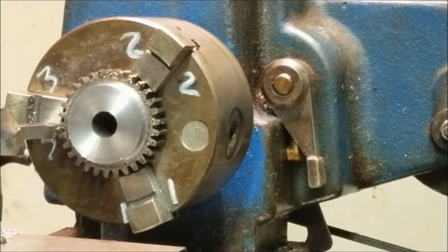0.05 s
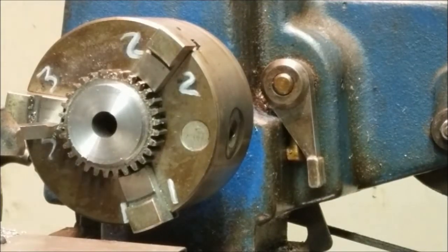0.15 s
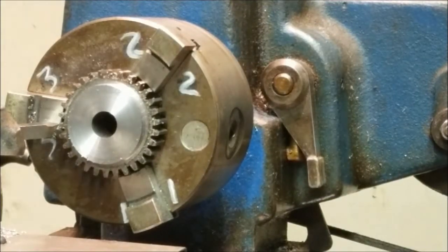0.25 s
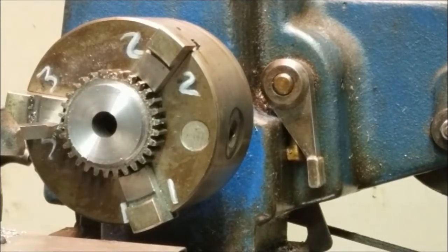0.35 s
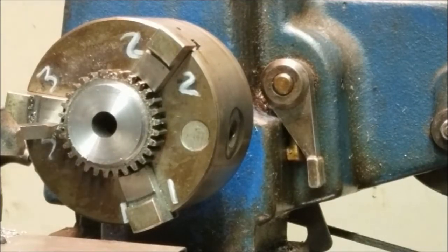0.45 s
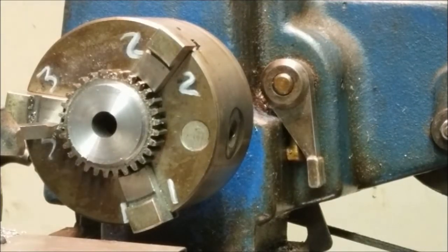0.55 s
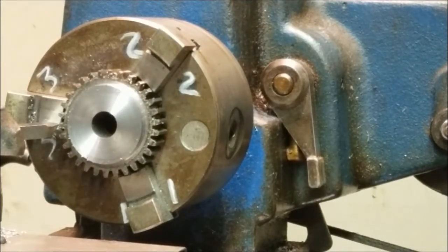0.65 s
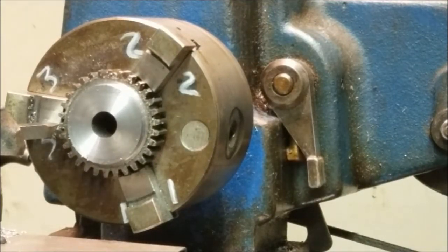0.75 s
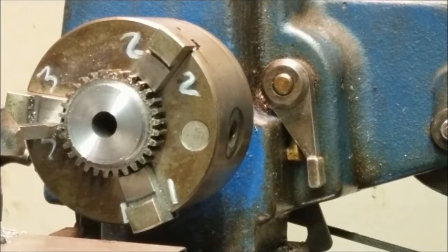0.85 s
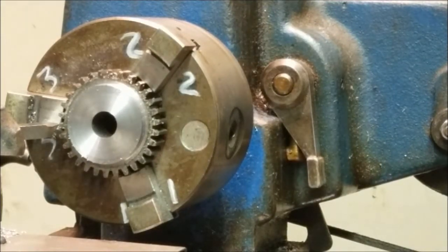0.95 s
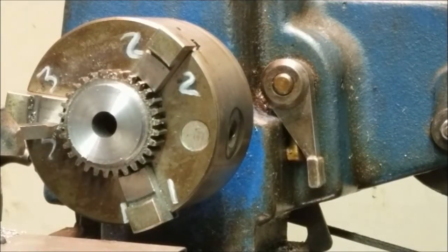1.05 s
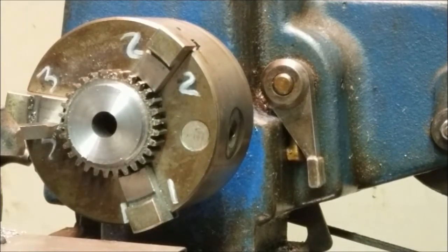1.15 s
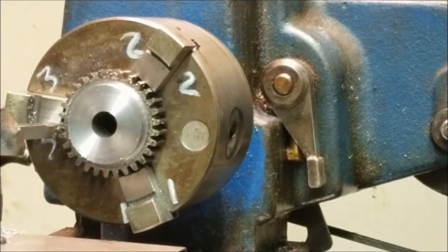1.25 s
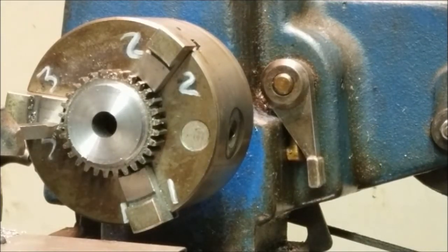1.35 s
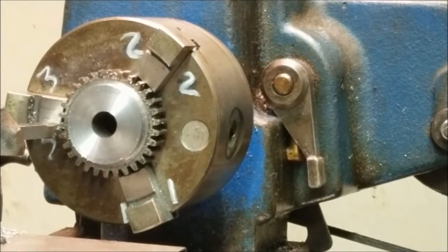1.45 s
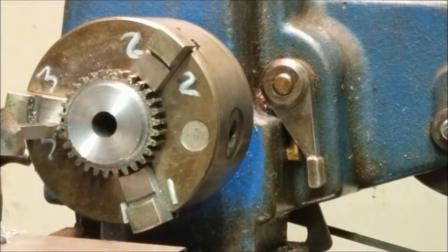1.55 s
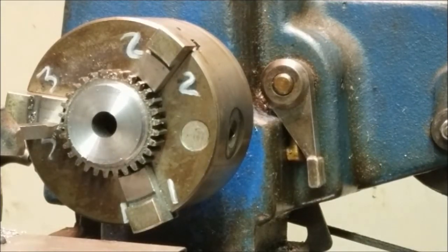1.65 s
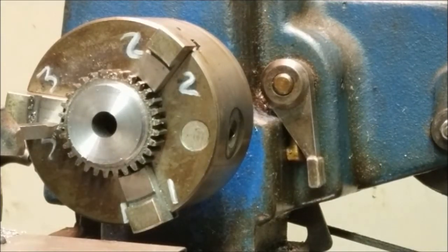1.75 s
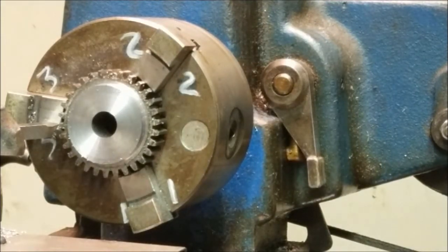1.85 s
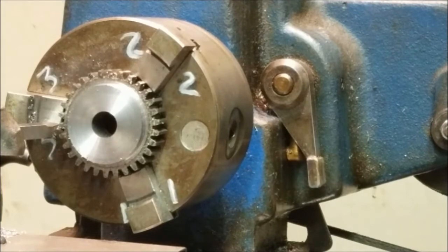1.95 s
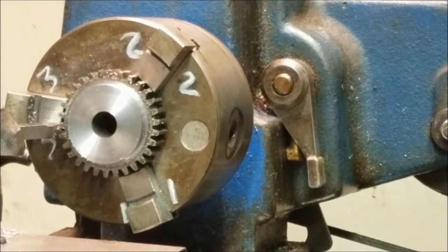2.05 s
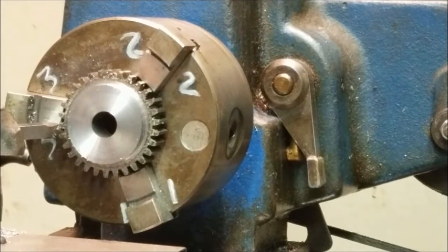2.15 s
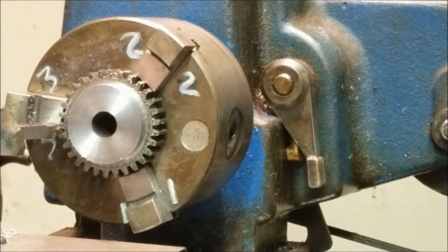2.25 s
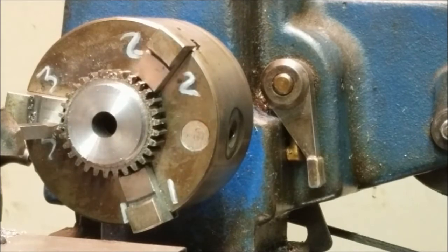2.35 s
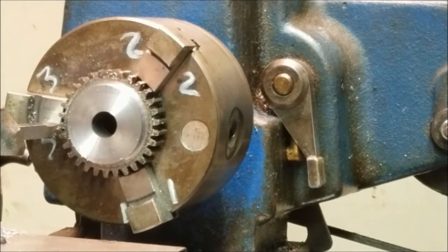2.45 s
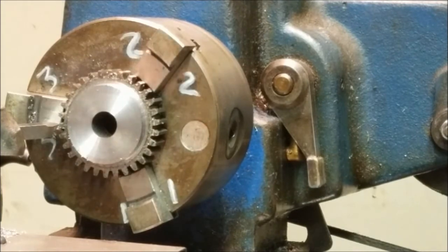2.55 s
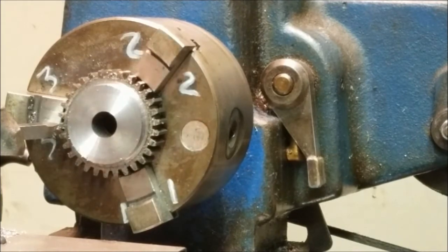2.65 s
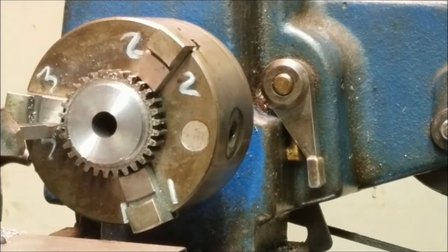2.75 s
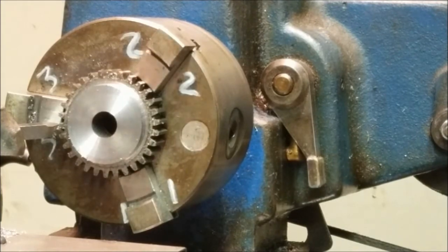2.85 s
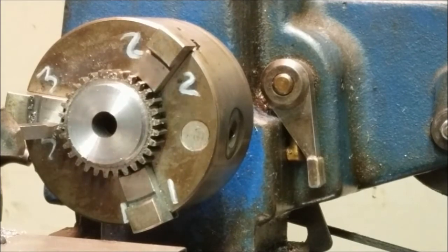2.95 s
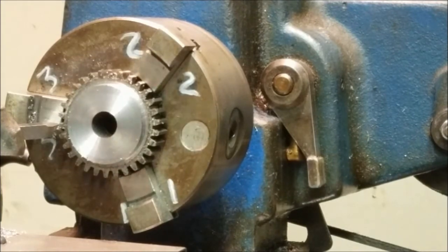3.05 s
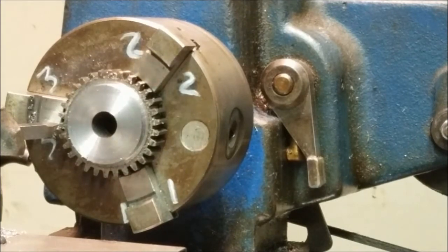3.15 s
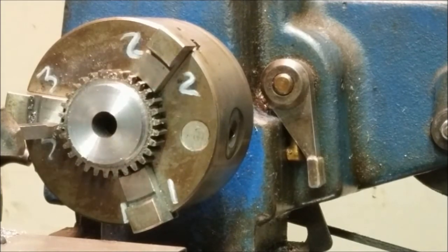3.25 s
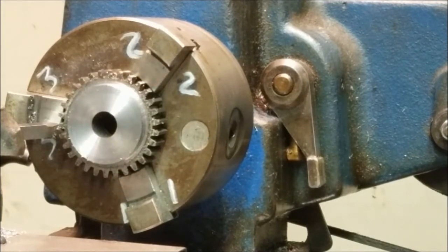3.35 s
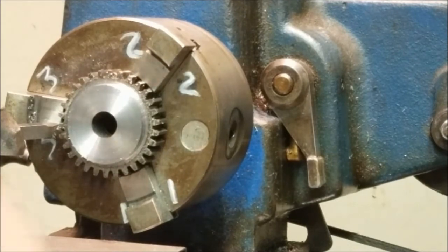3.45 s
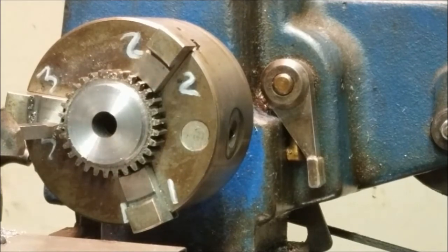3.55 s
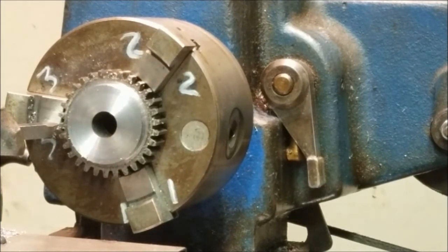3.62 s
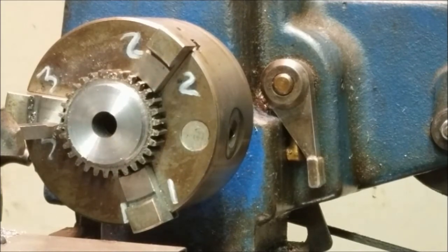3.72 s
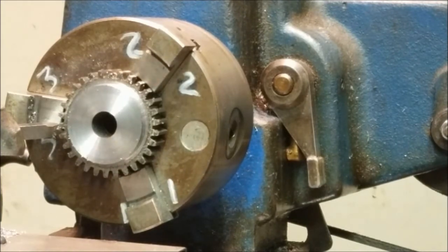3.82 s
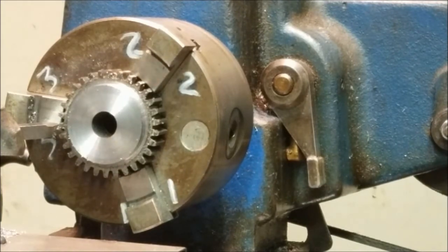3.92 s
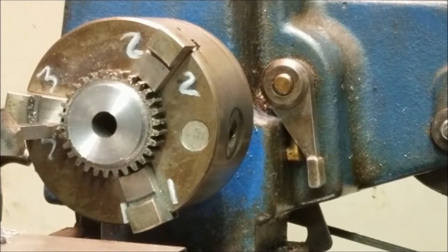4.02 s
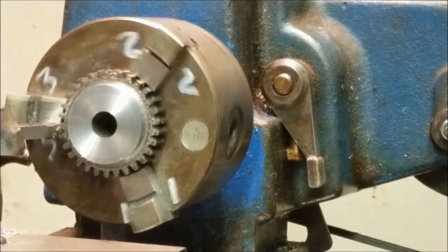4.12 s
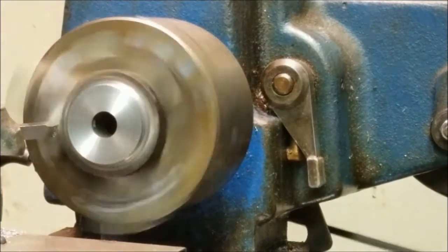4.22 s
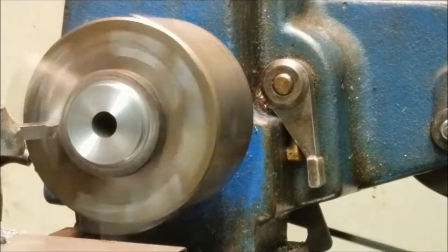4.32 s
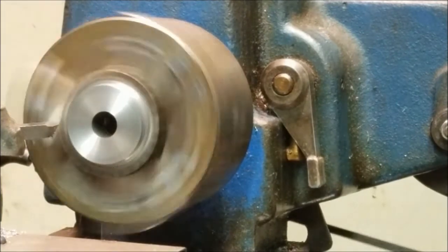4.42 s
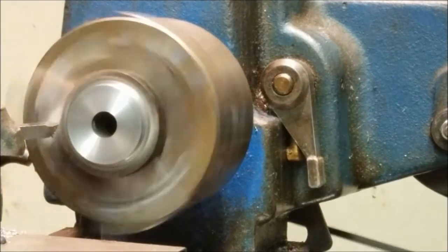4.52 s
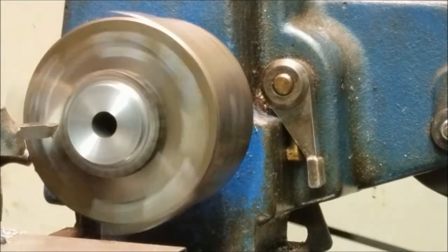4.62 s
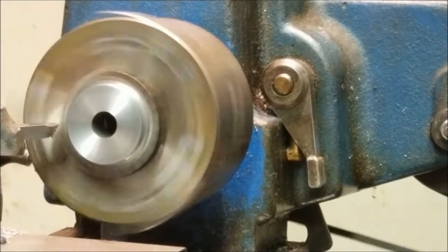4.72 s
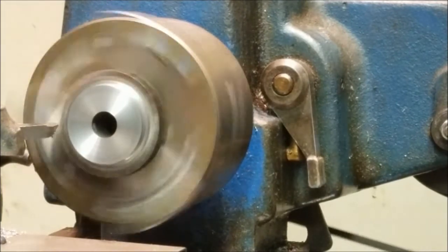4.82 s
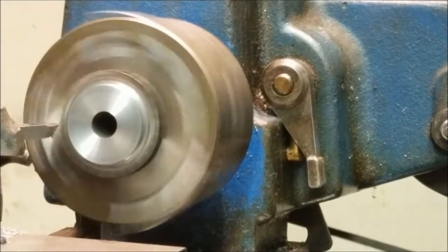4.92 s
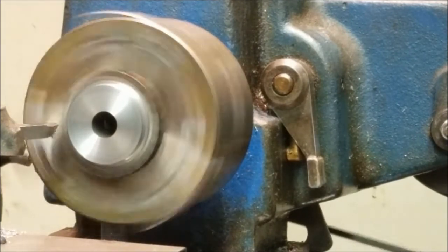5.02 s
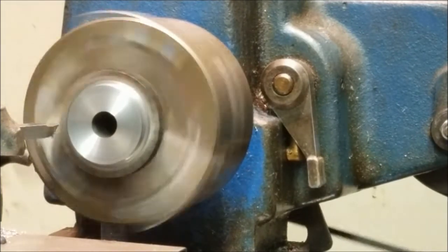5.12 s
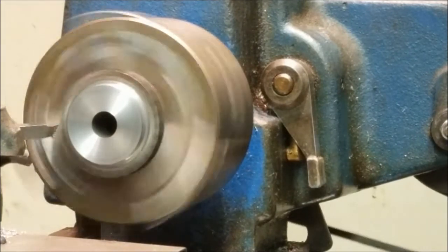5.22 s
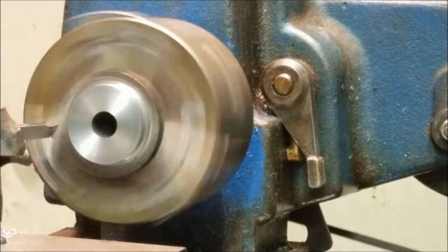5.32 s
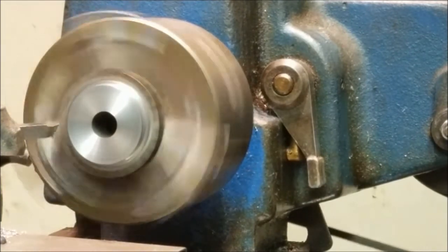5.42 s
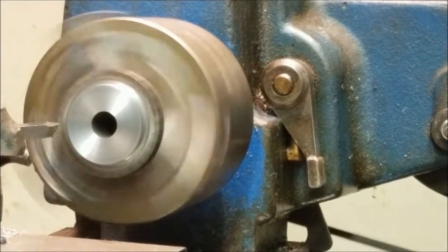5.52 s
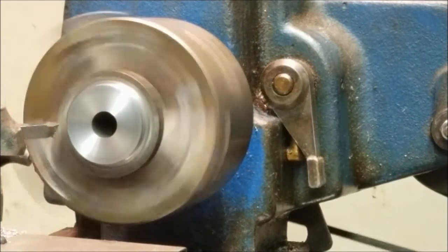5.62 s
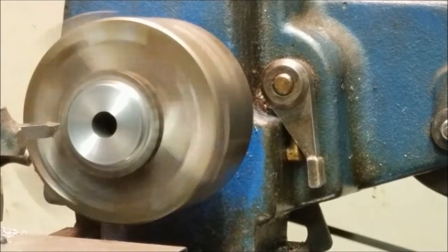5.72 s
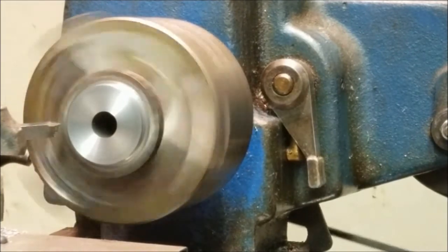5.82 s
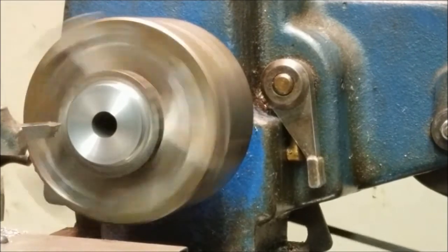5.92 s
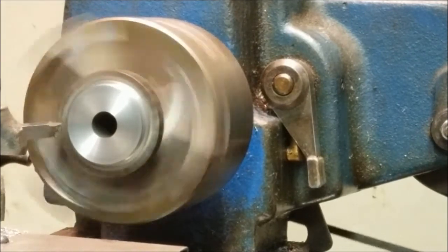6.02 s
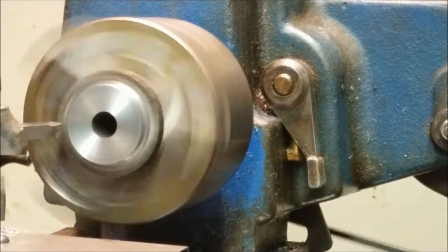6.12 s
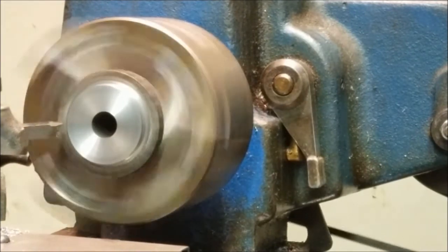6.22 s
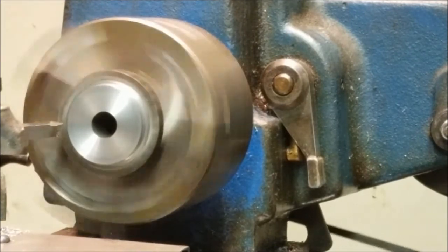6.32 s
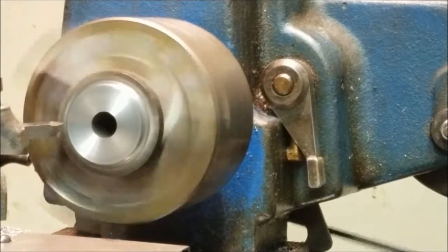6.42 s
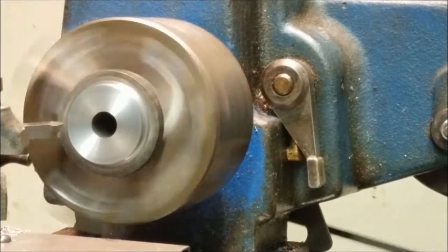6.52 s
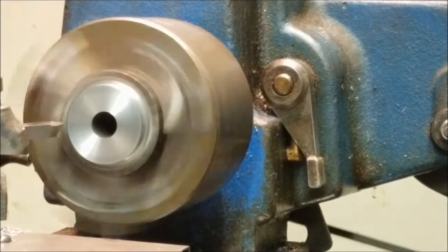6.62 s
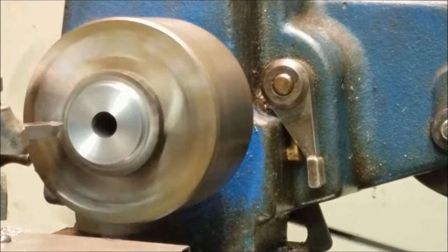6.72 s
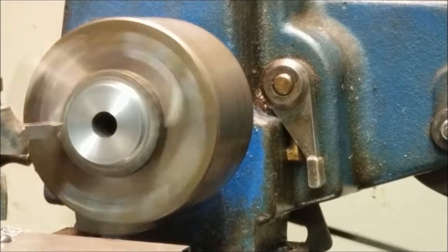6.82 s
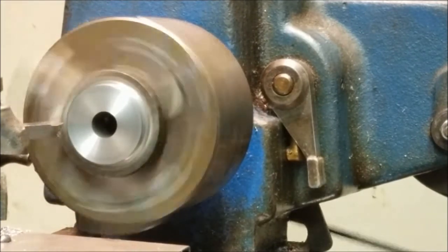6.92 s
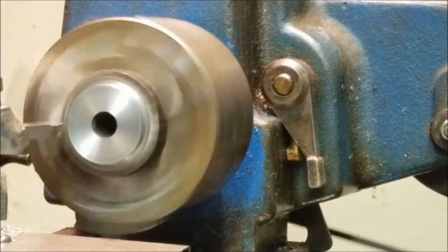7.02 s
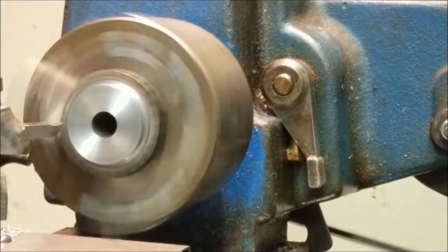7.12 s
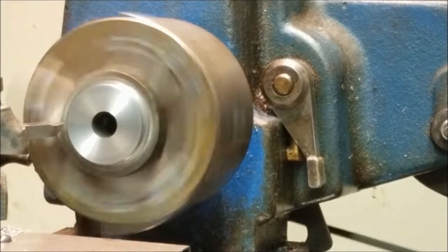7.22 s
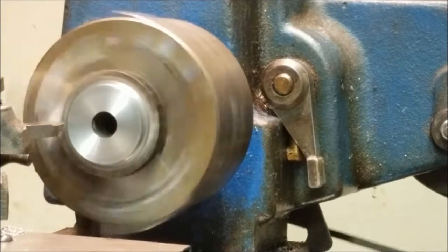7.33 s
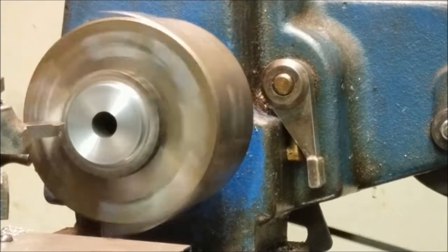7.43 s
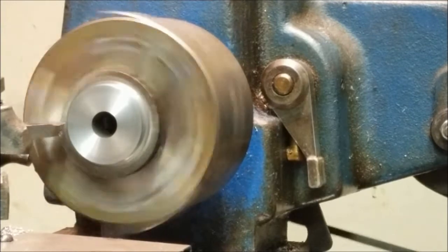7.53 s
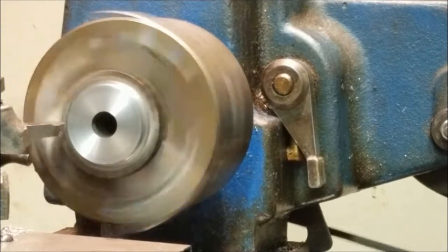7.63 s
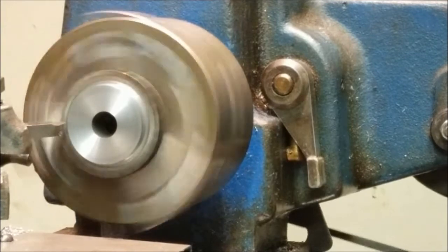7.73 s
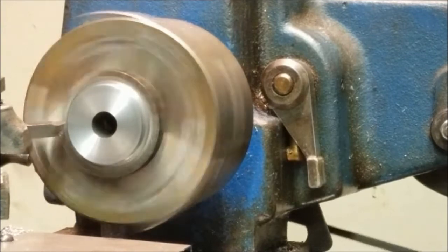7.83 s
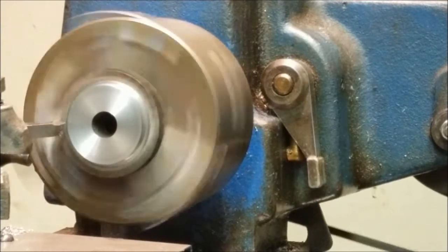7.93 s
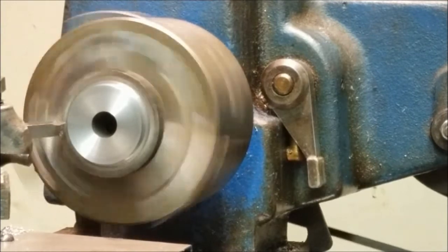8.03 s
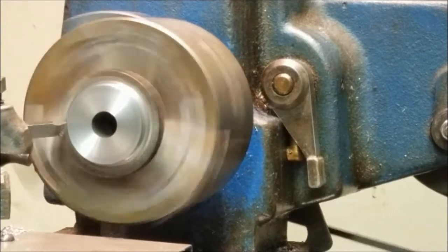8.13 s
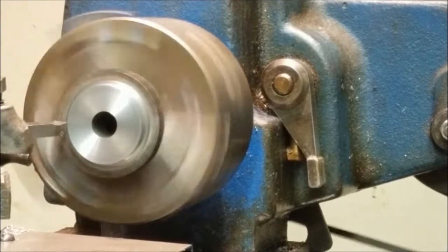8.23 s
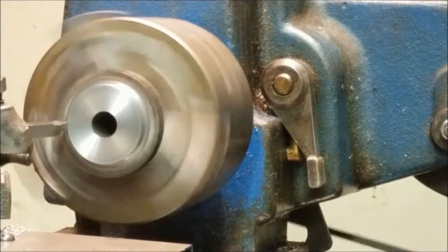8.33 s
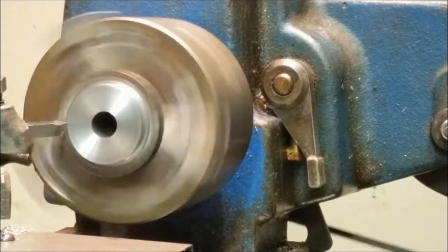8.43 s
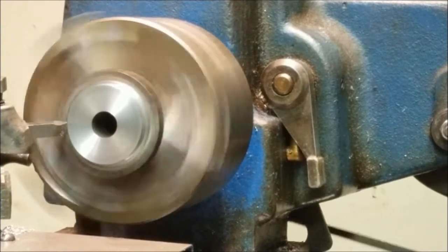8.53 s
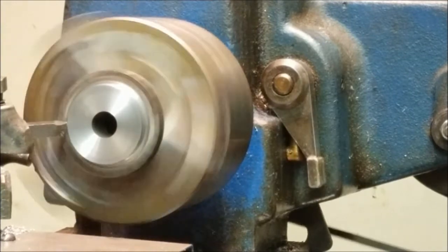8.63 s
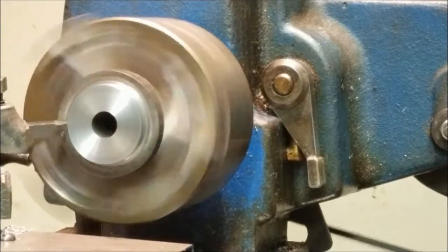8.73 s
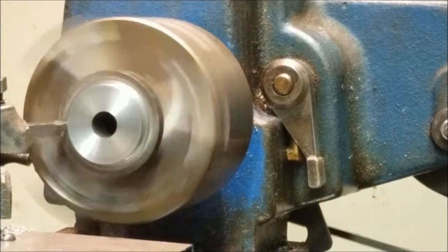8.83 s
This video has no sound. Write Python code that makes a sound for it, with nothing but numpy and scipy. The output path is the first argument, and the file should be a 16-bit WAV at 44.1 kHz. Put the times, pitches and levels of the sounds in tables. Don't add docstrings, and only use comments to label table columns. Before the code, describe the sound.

Close stereo pickup in a fairly dry workshop. Nearly silent room tone at first, with tiny ticks, sleeve scuffs and several clacks of metal levers. A near-silent gap follows, then one loud switch snap and a second thump as the motor catches, with a quick rising groan and hissy belt slip. The lathe then runs steadily: deep constant hum, soft whirring, slight buzz and sparse ticking of loose parts.

```python
import sys
import numpy as np
from scipy import signal
from scipy.fft import rfft, irfft, next_fast_len
from scipy.io import wavfile
from scipy.ndimage import uniform_filter1d, map_coordinates

SR = 44100
rng = np.random.default_rng(int(sys.argv[2]) if len(sys.argv) > 2 else 0)


def generate_wav(sig):
    pcm = np.round(np.clip(np.atleast_2d(sig).T, -1, 1) * 32767).astype(np.int16)
    wavfile.write(sys.argv[1], SR, pcm)


def decibels_to_gain(level_db):
    exponent = np.asarray(level_db, float) / 20
    return 10 ** exponent


N = 391166
T = np.arange(N) / SR
HUM_HZ, SLOT_HZ, TOP_HZ = 119.96, 1427.7, 15800
CURRENT_S, SLIP_S, SURGE_S = 4.08, 4.179, 4.19

# f/Hz, density/dB
ROOM_SPECTRUM = [(20, -10), (100, 1), (150, -3.5), (190, -17), (300, -20.5), (700, -27), (1300, -37.5),
                 (2200, -37), (3500, -41.5), (7000, -35.5), (9000, -39.5), (15800, -32)]
# f/Hz, level/dB
LAMP_TONES = [(839.8, -85.5), (1200, -87), (1798, -95), (1922, -93), (2040, -89), (2159, -99), (2277, -100)]
# f/Hz, likeness/1
STEREO_LIKENESS = [(30, 0.91), (130, 0.98), (290, 1), (640, 0.89), (1410, 0.75), (3100, 0.84), (6820, 0.92),
                   (15000, 0.85)]
# f/Hz, t60/s
ROOM_T60 = [(200, 0.24), (2000, 0.24), (10000, 0.22)]
# peak t/s, level/dB, rise/s, fall/s, brightness/dB per band
STROKES = [(.37, -63, 0.092, 1, 2.5), (.66, -65, 0.14, 0.11, 4.5), (1.11, -72.5, .008, 0.71, 0.5),
           (1.18, -71, .15, .3, -1), (1.3, -70, 0.22, .1, 6), (1.342, -50, 0.038, .18, 8),
           (1.74, -51.5, 0.022, 0.18, 3.5), (1.98, -68, 0.43, 0.45, 4), (2.382, -51, 0.039, 0.27, 5.5),
           (2.676, -44, 0.074, 0.2, -1.5), (2.9, -51, 0.016, 0.2, -0.5), (3.656, -78.5, 0.76, 0.72, -3),
           (4.041, -55.5, 0.017, 0.0055, -6)]
# f/Hz, density/dB
SCUFF_BANDS = [
    [(100, -29), (150, -4), (300, -2), (450, -24)],
    [(250, -26), (400, -2.5), (1300, -2.5), (2200, -37)],
    [(1000, -12.5), (1800, -8), (4500, -10), (7000, -23.5)],
    [(3500, -24), (5500, -1), (8500, -6), (10000, -15), (15900, -7)],
]
SCUFF_LEVELS_DB = (-15, -5.5, -1.3, -8)
# t/s, peak level/dB, ring f/Hz, ring level/dB
LEVER_CLICKS = [(0.338, -53, 870, 3), (0.357, -57.5, 860, 10.5), (0.377, -56.5, 900, 7),
                (.383, -57, 5000, 7), (.402, -62, 860, 8), (.423, -55.5, 2600, 4), (.485, -60, 7300, 5.5),
                (.597, -59, 2600, 9), (.615, -63, 2750, 9), (.638, -56, 5000, 4), (.659, -56, 2700, 7),
                (.68, -56, 2310, 8), (0.689, -65, 840, -1), (1.105, -56.5, 2400, -3),
                (1.237, -48, 8000, -9), (1.325, -31.5, 4200, -9.5), (1.328, -31, 2130, -3.5),
                (1.348, -24, 2360, -13), (1.727, -43, 553, 4.5), (1.735, -34, 910, -26),
                (1.764, -35.5, 530, -6), (1.977, -51, 2290, 3), (2.362, -41.5, 2450, -11),
                (2.367, -40, 4200, -4.5), (2.44, -52, 580, 7.5), (2.468, -35.5, 2300, -11),
                (2.597, -41.5, 6250, -5.5), (2.609, -33, 1170, -13), (2.646, -32, 2150, 1.5),
                (2.664, -27, 2330, 6), (2.669, -19.5, 2370, -1), (2.684, -21.5, 2210, 1),
                (2.689, -21.5, 4040, 0.5), (2.7, -35.5, 1290, 7.5), (2.898, -39.5, 2280, -1),
                (2.918, -49.5, 2700, 6), (2.684, -30, 8100, 4), (2.716, -35.5, 1275, 5),
                (2.55, -59, 11000, -2), (2.383, -44.5, 7000, -1), (3.56, -68, 1900, 6), (3.6, -72, 3100, 6),
                (3.66, -69, 1980, 6), (3.71, -63, 1850, 6)]
# t/s, level/dB, hardness/dB per octave, strongest f/Hz
KNOCKS = [(4.3033, -54.5, 11, 5000), (4.418, -47.5, 2, 8300), (4.5005, -47, -5, 3400),
          (4.5592, -48.5, 3.5, 4950), (4.7105, -47.5, 4, 12200), (5.0277, -44, 1, 8100),
          (5.3092, -58.5, 0, 2600), (5.5842, -52.5, 2.5, 5030), (5.7694, -45, -0.5, 8200),
          (6.0488, -41, -0.3, 8200), (6.1693, -46, 1, 9300), (6.318, -57.5, 4.5, 2600),
          (6.3923, -46.5, -1.5, 12300), (6.9453, -44, 3.5, 12400), (7.0592, -50, -2, 6900),
          (7.212, -41.5, 3.5, 8300), (7.3861, -49, -1, 3570), (7.4723, -49.5, -7.5, 2620),
          (7.4904, -46, -3, 9900), (7.633, -55.5, 6, 2600), (7.674, -49, 0, 2600), (7.808, -52.5, 4, 7450),
          (7.9345, -43.5, 2.5, 12300), (7.9539, -51.5, 8.5, 12300), (8.0854, -46, 1.5, 7000),
          (8.109, -43, 0, 8900), (8.295, -41, -2.5, 12300), (8.369, -66, 15.5, 5600),
          (8.4013, -54, 6, 12000), (8.8436, -41.5, 5, 12300)]
# t/s, level/dB, strongest f/Hz
FAINT_KNOCKS = [(4.682, -55, 3000), (4.8427, -52, 5400), (4.96, -55, 7500), (5.461, -59.5, 2400),
                (5.7334, -50, 8560), (5.85, -51.5, 2600), (5.885, -48, 8500), (5.973, -53, 3000),
                (6.019, -46, 8500), (6.1193, -52, 2500), (6.21, -53, 6350), (6.4113, -48, 3300),
                (6.479, -49, 7800), (6.6103, -54.5, 2600), (6.8085, -56.5, 2500), (7.7526, -57, 4020),
                (8.0389, -58, 2500), (8.2016, -59, 2640), (8.6067, -55, 3000)]
# f/Hz, level/dB
METAL_MODES = [
    [(2050, -2), (2350, -4.5), (2640, 2), (3200, -1), (3700, -4.5)],
    [(4400, -2), (4800, 5), (5200, 6), (5700, 2), (6300, -3)],
    [(7300, -0.5), (7800, 3), (8300, 3.5), (8900, 1), (9300, -11.5)],
    [(11800, 0), (12300, -6.5), (13300, -12.5)],
]
# t/s, f/Hz, level/dB, t60/s
STAND_JOLTS = [
    (4.13, 42, -42.5, 0.66),
    (4.199, 61.4, -32.5, .5),
]
# t/s, f/Hz, level/dB, half length/s
BED_GROANS = [(4.07, 850, -50, .025), (4.088, 199, -45.5, .03), (4.112, 470, -42.5, 0.013),
              (4.122, 231, -37, 0.017), (4.15, 838, -44, 0.022), (4.155, 1004, -47, 0.017),
              (4.168, 499, -38, 0.028), (4.19, 845, -37, 0.022), (4.195, 1297, -50.5, 0.022),
              (4.215, 1208, -44, 0.019), (4.222, 486, -36, 0.016), (4.223, 1020, -45, .015),
              (4.226, 842, -42, .02), (4.256, 1055, -51.5, .02), (4.268, 520, -41, 0.017)]
# t/s, level/dB, t60/s
SNAPS = [
    (4.025, -49, .02),
    (4.0292, -37, 0.017),
    (4.044, -27, .004),
    (4.046, -10, 0.013),
    (4.048, -27.5, 0.051),
    (4.2115, -17.5, 0.035),
    (4.218, -37, 0.081),
]
# f/Hz, width/Hz, level/dB
BOX_MODES = [(740, 180, 4), (1080, 200, -5), (1510, 480, -7), (2600, 320, 0), (3050, 150, 6.5),
             (4200, 580, -0.5), (6200, 1700, -7), (8000, 640, -5.5), (12000, 1600, -10)]
# level/dB over running, rise/s, fall/s
TORQUE_SURGE = (9, 0.14, 0.27)
# t/s, level/dB over normal
SHAKE = [(4.04, -29), (4.06, 2.5), (4.148, -2), (4.18, 5.5), (4.23, 17), (4.338, 2), (4.5, -1), (5.06, -2),
         (5.16, -1), (5.48, -1), (5.95, 1.5), (6.32, 4.5), (6.66, -.5), (7.3, 0.9), (8.75, 0.2),
         (8.87, 0.5)]
# multiple of hum/1, level/dB beside the seventh
COVER_BUZZ = [(4, 3.5), (5, -0.5), (6, -6.5), (7, 2.5), (8, -15.5), (9, -13.5), (10, -3.5), (12, -12),
              (14, -10)]
# t/s, length/s, rise of third multiple/dB
LOOSE_BOUTS = [
    (4.202, 0.12, 15),
    (5.95, 0.69, 12.5),
    (7.296, .3, 5.5),
    (8.0, .2, 5),
    (8.84, .1, 7),
]
# level/dB, rise/s, fall/s
BELT_SLIP = (-43, 0.059, 0.14)
# f/Hz, density/dB
SQUEAL_SPECTRUM = [(5200, -26), (6100, -1), (6600, -6), (7600, -6.5), (8800, -27), (12000, -13.5),
                   (13500, -9.5), (15800, -18)]
# f/Hz, density/dB
RUSH_SPECTRUM = [(800, -14.5), (1300, -5), (1800, -12.5), (2600, -11.5), (3500, -17), (4300, -16.5),
                 (4900, -22), (5500, -23), (6500, -25), (7300, -21.5), (8500, -26.5), (9400, -34),
                 (11600, -28), (13500, -34.5), (15800, -39.5)]
# f/Hz, density/dB
RUMBLE_SPECTRUM = [(82, -25), (140, -17.5), (158, -26.5), (174, -21), (303, -31.5), (479, -31),
                   (655, -36.5), (844, -36.5), (964, -39.5), (2500, -60), (3250, -94.5), (5500, -120)]
# f/Hz, density/dB
THRUM_SPECTRUM = [(20, -30.5), (45, -29), (60, -22.5), (90, -6), (130, -6.5), (170, -5), (200, -32)]
# f/Hz, level/dB, width/Hz
SHAFT_TONES = [(58.5, -59, 5), (89.5, -59, 6), (222, -60, 5), (390, -65, 2), (1129, -63, 4), (1259, -70, 6),
               (1309, -69, 6), (2024, -73, 40), (2649, -69, 90), (4283, -75, 40), (5469, -82, 40)]
# multiple of slot rate/1, level/dB
SLOT_TONES = [(1, -73), (3, -76), (5, -81), (6, -78), (7, -78), (8, -82), (9, -83)]
# t/s, hum level/dB
MAGNETIC_PULL = [(4.04, -91), (4.06, -81), (4.102, -46), (4.148, -40.5), (4.18, -22), (4.23, -13.5),
                 (4.338, -17.5), (4.45, -19), (4.9, -19.5), (5.25, -19.5), (5.55, -18.5), (6.1, -18.5),
                 (6.45, -18), (6.9, -19), (7.3, -17.8), (7.85, -18.5), (8.6, -18), (8.8, -19)]


def unit(x):
    return x / np.sqrt(np.mean(x ** 2) + 1e-20)


def along(points, hz):
    f, value = np.transpose(points)
    return np.interp(np.log(hz + 1), np.log(f + 1), value)


def curve(rows):
    s, value = np.transpose(rows)
    return np.interp(T, s, value)


def wobble(rate_hz):
    coarse = T[::32]
    knots = rng.standard_normal(int(N * rate_hz / SR) + 4)
    return np.interp(T, coarse, map_coordinates(knots, [coarse * rate_hz]))


def rush(spectrum, patchy_db):
    z = signal.stft(rng.standard_normal((2, N)), nperseg=512)[2]
    field = uniform_filter1d(rng.standard_normal(z.shape[1:]), size=6, axis=0)
    field = uniform_filter1d(field, size=8, axis=1)
    pair = signal.istft(z * decibels_to_gain(patchy_db * unit(field)), nperseg=512)[1][:, :N]
    m = next_fast_len(N)
    hz = np.fft.rfftfreq(m, 1 / SR)
    turn = np.arccos(np.clip(along(STEREO_LIKENESS, hz), -1, 1)) / 2
    inside = (hz >= spectrum[0][0]) * (hz <= spectrum[-1][0])
    gain = decibels_to_gain(along(spectrum, hz)) * inside
    mid, side = irfft(rfft(pair, m) * gain * [np.cos(turn), np.sin(turn)], m)[:, :N]
    return unit(np.array([mid + side, mid - side]))


def tone(hz, drift_rad, flutter_db, rate_hz):
    level = np.sqrt(2) * decibels_to_gain(flutter_db * wobble(rate_hz))
    phase = 2 * np.pi * hz * T + drift_rad * wobble(rate_hz) + rng.uniform(0, 2 * np.pi)
    return level * np.sin(phase)


def add(x, s, sound):
    part = x[..., round(s * SR):][..., :sound.shape[-1]]
    part += sound[..., :part.shape[-1]]


def swell(s, db, rise_s, fall_s):
    away = np.where(T < s, (s - T) / rise_s, (T - s) / fall_s)
    return decibels_to_gain(db - 30 * away.clip(0, 4))


def running(surge_db=0):
    steady = np.clip((T - CURRENT_S) / 0.071, 0, 1)
    return steady + decibels_to_gain(surge_db) * swell(SURGE_S, *TORQUE_SURGE) * (T > 4.04)


def room_tone():
    lamps = sum(decibels_to_gain(db - 2.5) * tone(hz, drift_rad=1, flutter_db=3, rate_hz=12) for hz, db in LAMP_TONES)
    return decibels_to_gain(-67.5) * rush(ROOM_SPECTRUM, patchy_db=1.2) + lamps


def shop(x):
    hz, t, z = signal.stft(rng.standard_normal((2, SR // 2)), SR, nperseg=256)
    decay = decibels_to_gain(-60 * t / along(ROOM_T60, hz)[:, None])
    tail = signal.istft(z * decay, SR, nperseg=256)[1]
    tail = tail + 0.1 * tail[::-1]
    late = np.pad(x, (200, 0))
    return signal.fftconvolve(late[None], tail / np.linalg.norm(tail[0]), axes=1)[:, :N]


def scuffs():
    strokes = [(swell(s, db, rise_s, fall_s), bright_db) for s, db, rise_s, fall_s, bright_db in STROKES]
    clumps = decibels_to_gain(1.4 * wobble(60) + 1.1 * wobble(250) - 3.5) * (T < 4.05)
    out = np.zeros((2, N))
    for k, (db, band) in enumerate(zip(SCUFF_LEVELS_DB, SCUFF_BANDS)):
        effort = sum(decibels_to_gain(db + bright_db * (k - 2)) * gain for gain, bright_db in strokes)
        out += clumps * effort * rush(band, patchy_db=0.0)
    return out


def lever_clicks():
    out, t = np.zeros((2, N)), T[:SR // 5]
    for s, db, hz, ring_db in LEVER_CLICKS:
        rattle_db = -6.5 - 0.4 * (db + 38)
        pan_db = rng.normal(-2, 4.5)
        partials = 0
        for k, level_db in [(1.01, -2), (1.75, -13), (3.6, -21.5)]:
            partials = partials + decibels_to_gain(level_db + rng.normal(0, 3.1)) * np.sin(2 * np.pi * hz * k * t)
        ring = decibels_to_gain(-60 * t / (0.023 + 15 / hz)) * partials
        crack = decibels_to_gain(-60 * t / 0.0091) * uniform_filter1d(rng.standard_normal(len(t)), size=3)
        colour = decibels_to_gain(-60 * t * hz / 6) * partials + 0.74 * crack
        chatter = unit(signal.fftconvolve(rng.standard_normal(len(t)), colour)[:len(t)])
        rattle = decibels_to_gain(rattle_db - 60 * t / (0.065 + 0.00003 * hz)) * chatter
        small = signal.butter(2, 0.3 * hz, "high", fs=SR, output="sos")
        contact = signal.sosfilt(small, decibels_to_gain(ring_db) * ring + crack + 0.5 * rattle)
        add(out, s, decibels_to_gain(db - 9.5 + np.array([[pan_db], [-pan_db]]) / 2) * contact)
    return out


def struck_modes(t, hardness_db, accent_hz):
    ring = np.zeros(len(t))
    for group_db, group in zip((0.5, -11, -15, -23.5), METAL_MODES):
        for hz, mode_db in group:
            tilt_db = hardness_db * np.log2(hz / 2600)
            accent_db = 6.5 * np.exp(-(np.log2(hz / accent_hz) / 0.56) ** 2)
            level_db = group_db + mode_db + tilt_db + accent_db + rng.normal(0, 2.5)
            ring += decibels_to_gain(level_db - 60 * t / 0.011) * np.sin(2 * np.pi * hz * rng.normal(1, 0.012) * t)
    return ring * (1 - np.exp(-t / 0.0005))


def loose_parts():
    out, t = np.zeros((2, N)), T[:SR // 8]
    faint = [(s, db, 0.3, hz) for s, db, hz in FAINT_KNOCKS]
    for s, db, hardness_db, accent_hz in list(KNOCKS) + faint:
        ring = struck_modes(t, hardness_db, accent_hz)
        fade = decibels_to_gain(-60 * (t / 0.048) ** 2.14) + 2.4 * decibels_to_gain(-60 * t / 0.005)
        rattle = fade * rng.standard_normal((2, len(t)))
        rattle = rattle + 3.02 * rattle.mean(axis=0)
        add(out, s, decibels_to_gain(db - 33.5) * signal.fftconvolve(ring[None], rattle, axes=1)[:, :len(t)])
    return out


def stand_jolt():
    out, t = np.zeros(N), T[:SR // 2]
    for s, hz, db, t60_s in STAND_JOLTS:
        sway = decibels_to_gain(db - 60 * t / t60_s) * (1 - np.exp(-t / 0.023))
        add(out, s, sway * np.sin(2 * np.pi * hz * t))
    return out


def bed_groan():
    out = np.zeros(N)
    for s, hz, db, half_s in BED_GROANS:
        t = T[:round(4 * half_s * SR)] - 2 * half_s
        level = np.sqrt(2) * decibels_to_gain(db - 17 * (t / half_s) ** 2)
        add(out, s - 2 * half_s, level * np.sin(2 * np.pi * hz * t + rng.uniform(0, 2 * np.pi)))
    return out


def switch():
    snaps, t = np.zeros((2, N)), T[:SR // 5]
    for s, db, t60_s in SNAPS:
        noise = rng.standard_normal(len(t)) + 0.39 * rng.standard_normal((2, len(t)))
        add(snaps, s, decibels_to_gain(db - 60 * t / t60_s) * noise)
    f = np.fft.rfftfreq(N, 1 / SR)
    box = 0
    for k, (hz, width_hz, db) in enumerate(BOX_MODES):
        damping = 1j * f * width_hz
        box = box + (-1) ** k * decibels_to_gain(db) * damping / (hz * hz - f * f + damping)
    low_cut = (1j * f / (380 + 1j * f)) ** 4
    return irfft(rfft(snaps) * box * low_cut, N)


def cover():
    loose_db = 0
    for s, length_s, db in LOOSE_BOUTS:
        inside_s = np.minimum(T - s, s + length_s - T)
        loose_db = loose_db + db * np.clip(inside_s / 0.052 + 0.5, 0, 1)
    shake_db = curve(SHAKE) * (T > 4.4)

    def partial(k):
        return tone(k * HUM_HZ, drift_rad=0.46, flutter_db=1.5, rate_hz=12)

    upper = sum(decibels_to_gain(db) * partial(k) for k, db in COVER_BUZZ)
    upper = decibels_to_gain(-61.5 + 1.5 * shake_db) * upper
    third = decibels_to_gain(-58 + loose_db + 0.61 * wobble(2.1)) * np.clip((T - CURRENT_S) / 0.12, 0, 1) * partial(3)
    second = decibels_to_gain(-51 + 0.11 * loose_db + 2.5 * wobble(5.0))
    second = second * tone(2 * HUM_HZ, drift_rad=1.3, flutter_db=2.5, rate_hz=22)
    return third + running(surge_db=-5) * second + running(surge_db=-3.0) * upper


def belt_squeal():
    return swell(SLIP_S, *BELT_SLIP) * rush(SQUEAL_SPECTRUM, patchy_db=2.5)


def bearings():
    return decibels_to_gain(-54 + curve(SHAKE) + 0.82 * wobble(15)) * rush(RUSH_SPECTRUM, patchy_db=2.0)


def bed_rumble():
    shake_db = curve(SHAKE) * (T > 4.4)
    pull = 1 + 0.16 * np.cos(4 * np.pi * HUM_HZ * T)
    rumble = decibels_to_gain(-43.5 + 0.6 * shake_db + 0.9 * wobble(3)) * pull * rush(RUMBLE_SPECTRUM, patchy_db=1.2)
    thrum = decibels_to_gain(-48 + 2 * wobble(2.4)) * rush(THRUM_SPECTRUM, patchy_db=2.0)
    return running() * (rumble + thrum)


def rotor():
    speed = np.clip((T - 4.1) / 0.32, 0, 1) ** 2
    shaft, whine = 0, 0
    for hz, db, width_hz in SHAFT_TONES:
        level = decibels_to_gain(db + 3.5 * wobble(2.5))
        shaft = shaft + level * tone(hz, drift_rad=1.1, flutter_db=2.5, rate_hz=width_hz)
    for k, db in SLOT_TONES:
        whine = whine + decibels_to_gain(db) * tone(k * SLOT_HZ, drift_rad=1.3, flutter_db=0.8, rate_hz=40)
    sidebands = 0.8 + 0.9 * np.cos(2 * np.pi * HUM_HZ * T) + 0.3 * np.cos(4 * np.pi * HUM_HZ * T)
    return speed * (shaft + whine * sidebands)


def stator_hum():
    since = T - 4.255
    rock_fade = np.exp(np.where(since < 0, since / 0.037, -since / 0.07))
    rocking_db = 4 * np.cos(2 * np.pi * 17.0 * since) * rock_fade
    return decibels_to_gain(curve(MAGNETIC_PULL) + rocking_db) * tone(HUM_HZ, drift_rad=0.03, flutter_db=0.1, rate_hz=9)


def scene():
    hits, snaps = lever_clicks() + loose_parts(), switch()
    echoes = shop((decibels_to_gain(-5.0) * hits + decibels_to_gain(-10.5) * snaps).mean(axis=0))
    hand = scuffs() + hits + snaps + echoes
    start = stand_jolt() + bed_groan() + belt_squeal()
    lathe = cover() + bearings() + bed_rumble() + rotor() + stator_hum()
    return room_tone() + hand + start + lathe


def roll_off(x):
    return signal.sosfilt(signal.butter(12, 15980, fs=SR, output="sos"), x)


def record(dry):
    audible = np.fft.rfftfreq(N, 1 / SR) < TOP_HZ
    mix = irfft(rfft(dry) * audible, N)
    return roll_off(mix)


dry = scene()
out = record(dry)
generate_wav(out)
```